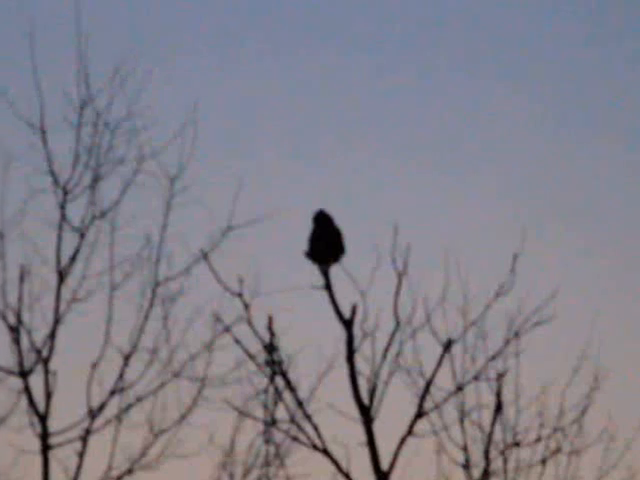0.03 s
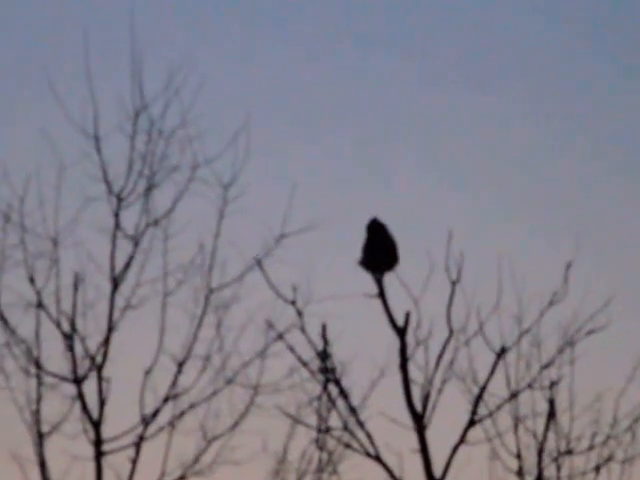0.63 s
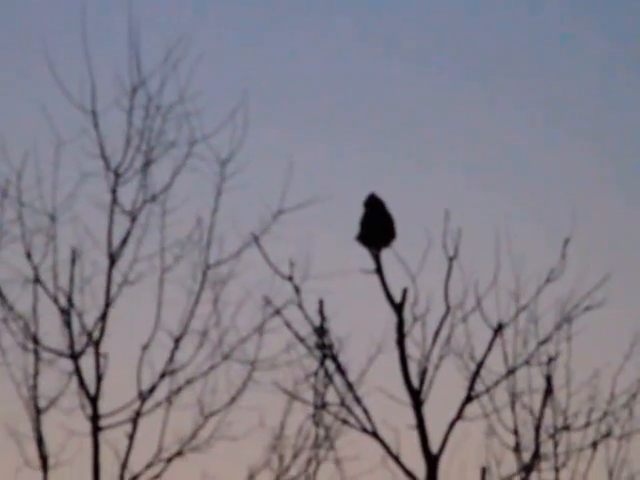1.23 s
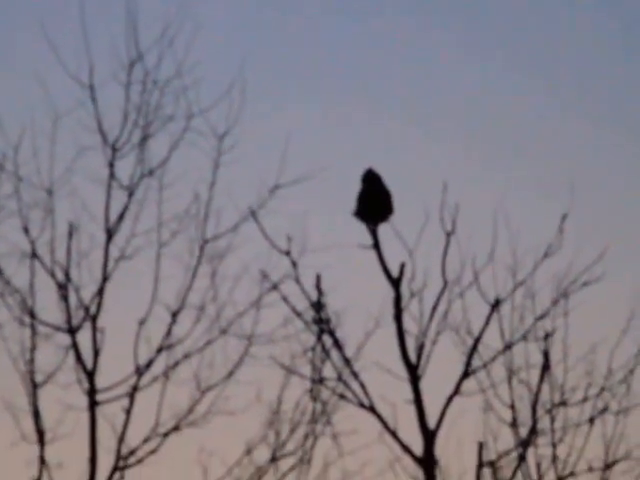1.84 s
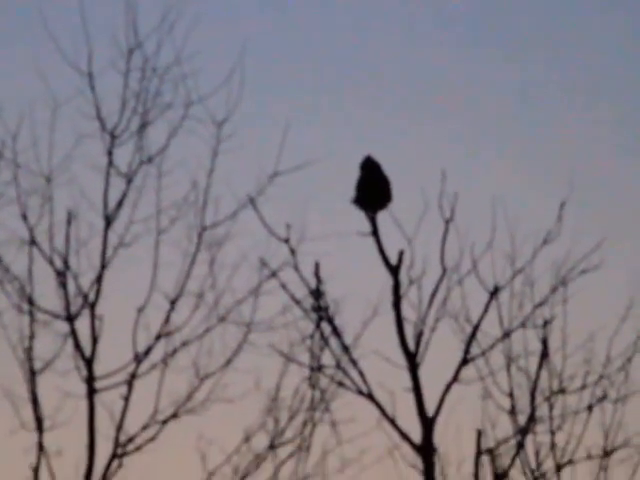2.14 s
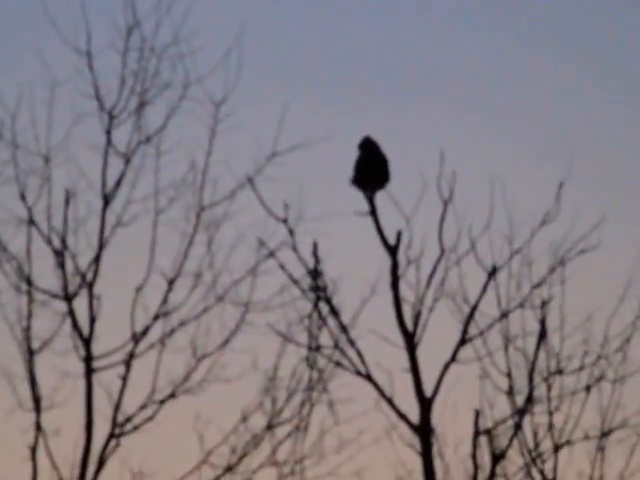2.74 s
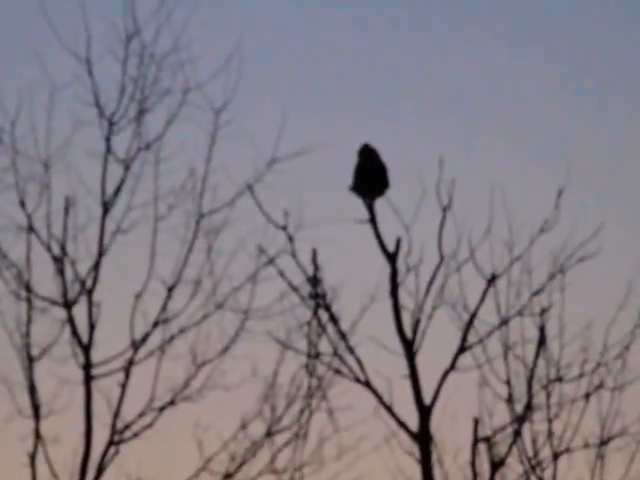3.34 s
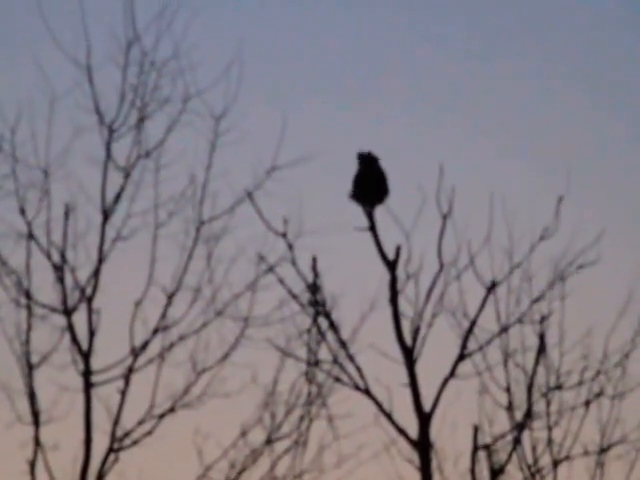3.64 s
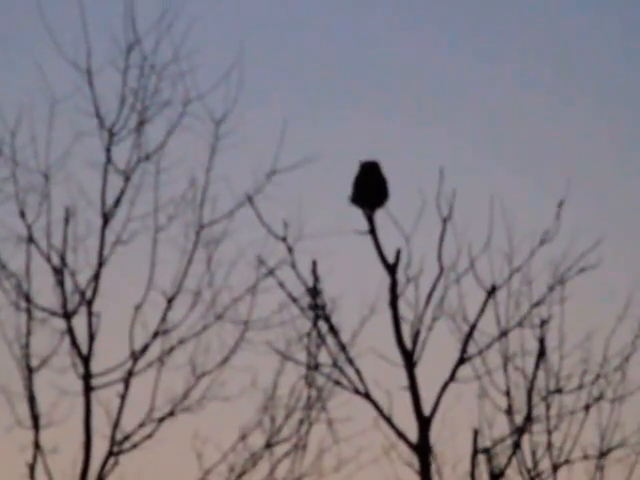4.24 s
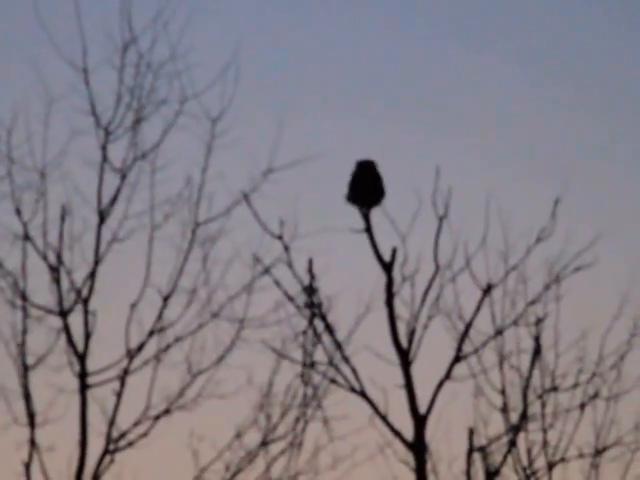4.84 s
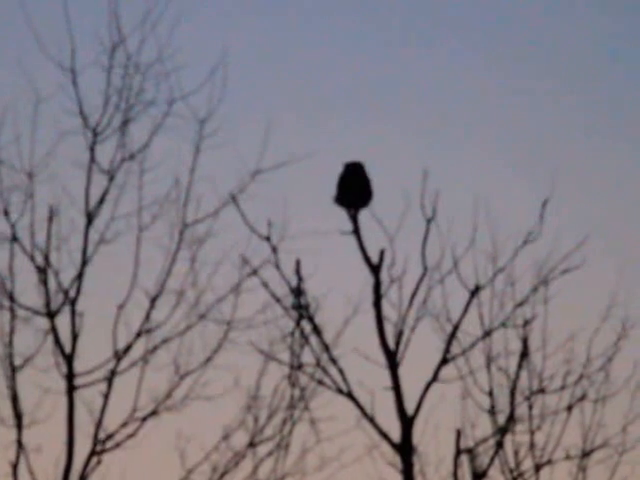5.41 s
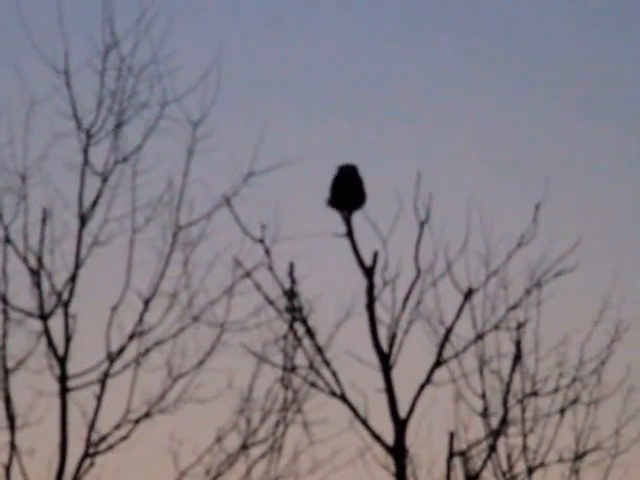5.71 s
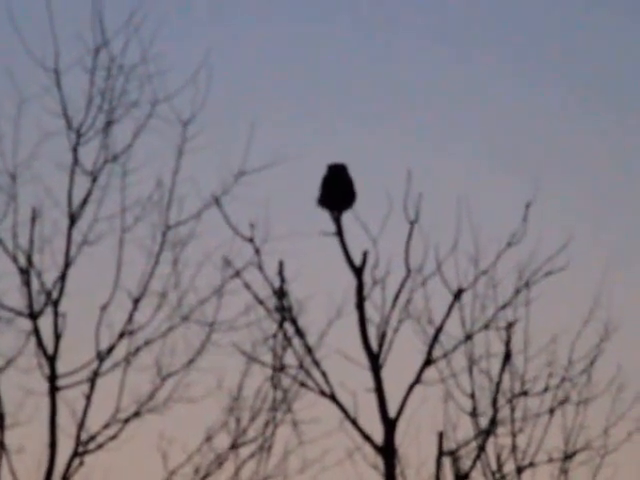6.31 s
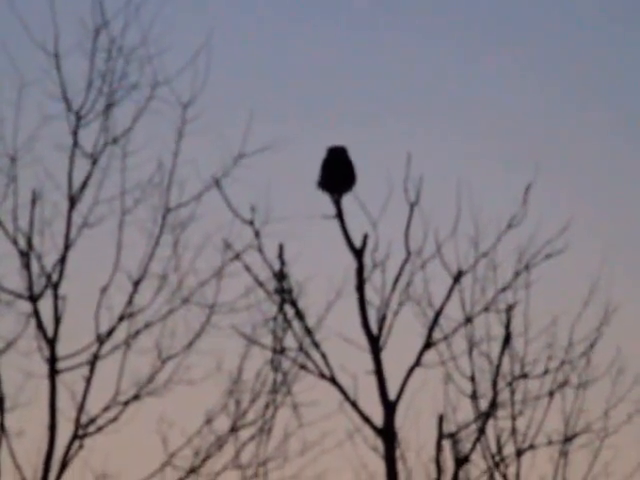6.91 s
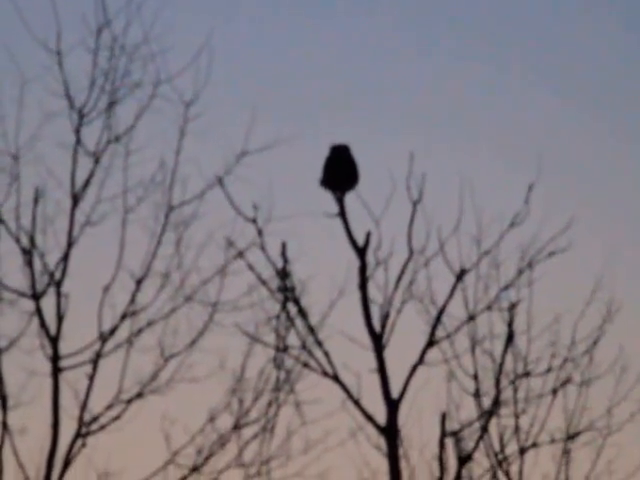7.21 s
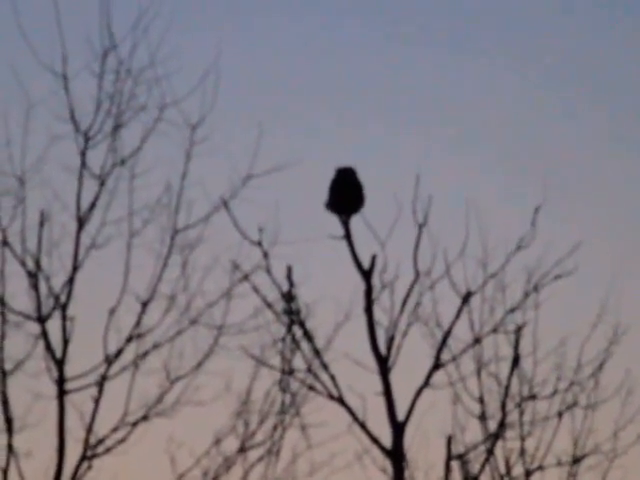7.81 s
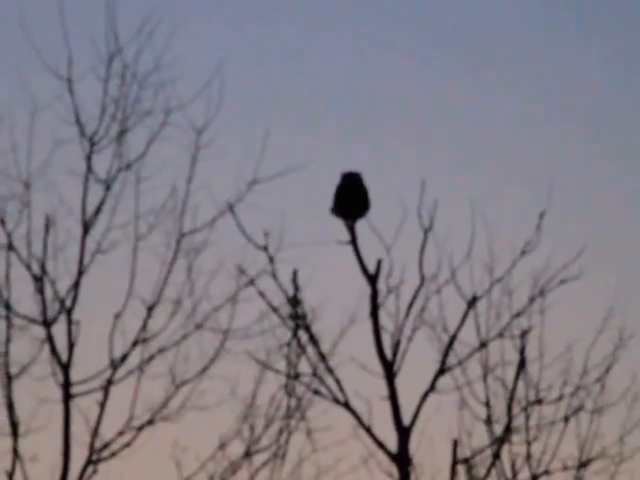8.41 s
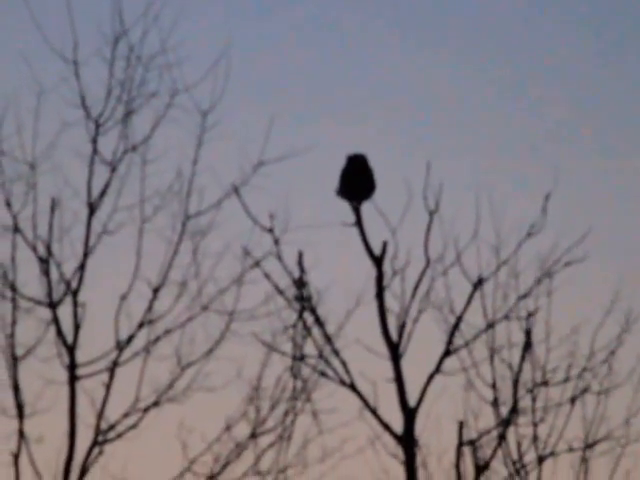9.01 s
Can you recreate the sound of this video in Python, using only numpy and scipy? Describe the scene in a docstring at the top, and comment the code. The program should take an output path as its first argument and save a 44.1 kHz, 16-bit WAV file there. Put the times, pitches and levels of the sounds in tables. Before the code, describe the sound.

A young owl gives one short raspy screech among trees, over gusts of wind buffeting the microphone and a faint distant rush.

```python
"""A young owl on a bare treetop gives one rasping begging screech, which echoes away among the trees.
Its syrinx sounds two voices at once, a rough whistle near 3 kHz and a soft low tone near 1 kHz;
fluttering membranes make the rasp. Gusts buffet the microphone over a distant outdoor rush,
and the hand-held camera rustles and ticks."""
import sys
import numpy as np
from scipy import signal
from scipy.fft import rfft, irfft, next_fast_len
from scipy.io import wavfile
from scipy.ndimage import uniform_filter1d

SR = 44100
rng = np.random.default_rng(int(sys.argv[2]) if len(sys.argv) > 2 else 0)


def master(y):
    """Save y as 16-bit WAV."""
    cut = np.clip(np.atleast_2d(y).T, -1, 1)
    pcm = np.round(cut * 32767)  # scale
    wavfile.write(sys.argv[1], SR, pcm.astype(np.int16))


N = 403515
TIME = np.arange(N) / SR


def from_db(db):
    """Decibels to gain."""
    return 10 ** (np.asarray(db) / 20)


def rms_one(x):
    """Scale to unit rms."""
    return x / np.sqrt(np.mean(x ** 2) + 1e-20)


def in_time(rows):
    """Value columns of a time curve, interpolated per sample."""
    times_s, *columns = np.transpose(rows)
    return [np.interp(TIME, times_s, column) for column in columns]


def during(rows):
    """True while a curve lasts."""
    return (TIME > rows[0][0]) & (TIME < rows[-1][0])


def noise(spectrum):
    """Unit-rms noise shaped by (frequency [Hz], gain [dB]) rows."""
    size = next_fast_len(N)
    hz, db = np.transpose(spectrum)
    bins_hz = np.maximum(np.arange(size // 2 + 1) * SR / size, 1)
    gain = from_db(np.interp(np.log(bins_hz), np.log(hz), db))
    return rms_one(irfft(rfft(rng.standard_normal(size)) * gain, size)[:N])


def wobble(rate_hz):
    """Unit-rms random motion, low-passed at rate_hz."""
    lowpass = signal.butter(2, rate_hz, fs=SR, output="sos")
    return rms_one(signal.sosfilt(lowpass, rng.standard_normal(N + SR))[SR:])


def resonate(x, hz, width_hz):
    """Two-pole resonance, unit peak gain."""
    radius = np.exp(-np.pi * width_hz / SR)
    feedback = [1, -2 * radius * np.cos(2 * np.pi * hz / SR), radius ** 2]
    return signal.lfilter(np.array([1, 0, -1]) * (1 - radius ** 2) / 2, feedback, x)


def band(x, hz, width_hz):
    """Two equal resonances in series."""
    return resonate(resonate(x, hz, width_hz), hz, width_hz)


def phase_of(hz):
    """Running phase [rad] of a moving frequency."""
    return 2 * np.pi * np.cumsum(hz) / SR


def bursts(rows):
    """Envelope of sudden onsets with exponential decay."""
    return sum((TIME >= start_s) * from_db(db - 60 * np.clip((TIME - start_s) / t60_s, 0, 2))
               for start_s, db, t60_s in rows)


def swells(rows):
    """Envelope of bell-shaped swells, summed in power."""
    power = sum(from_db(db) ** 2 * np.exp(-2 * np.minimum(((TIME - centre_s) / half_s) ** 2, 20))
                for centre_s, db, half_s in rows)
    return np.sqrt(power)


def background(body_gain_db=2.0, edge_gain_db=2.5, hiss_db=-60, swell_width_hz=110):
    """Far rush of the landscape with faintly pitched swells, plus microphone hiss."""
    # (time [s], body level [dB], upper edge level [dB])
    rush_levels = [(0, -51, -55.5), (1.27, -52.5, -55), (1.65, -53, -59), (2.9, -55.5, -58.5),
                   (4.3, -53, -59), (5.3, -54.5, -62), (6.5, -54.5, -61.5), (8.2, -53.5, -59.5),
                   (9.15, -52, -59)]
    # (frequency [Hz], gain [dB])
    body_spectrum = [(25, 7), (60, -6.5), (120, 5.5), (180, 1), (350, 1.5), (600, 2), (850, -1.5),
                     (1200, -13), (2000, -31.5)]
    edge_spectrum = [(500, -12.5), (800, -2.5), (1050, 0.5), (1300, -5), (1700, -11), (2400, -26.5),
                     (4000, -28)]
    hiss_spectrum = [(300, -6.5), (2000, 4), (4500, 2), (7000, -.5), (11000, -1.5), (14000, -5),
                     (16000, -17)]
    # (centre [s], pitch [Hz], peak [dB], half length [s])
    rush_swells = [(1.007, 1020, -54.5, 0.086), (1.317, 1010, -56, 0.22), (4.093, 780, -61, 0.24),
                   (4.9, 796, -61, 0.31), (9.03, 1040, -63, 0.13)]
    body_db, edge_db = in_time(rush_levels)
    rush = from_db(body_db + body_gain_db) * noise(body_spectrum)
    rush += from_db(edge_db + edge_gain_db) * noise(edge_spectrum)
    for centre_s, hz, db, half_s in rush_swells:
        hum = rms_one(band(rng.standard_normal(N), hz, swell_width_hz))
        rush += from_db(db) * np.exp(-((TIME - centre_s) / half_s) ** 2) * hum
    return rush + from_db(hiss_db) * noise(hiss_spectrum)


def airflow(breeze_spread_db=4.5, gust_spread_db=3.0, puff_hz=17):
    """Flow strength at the microphone port: a puffing breeze and steadier gusts."""
    # (time [s], level [dB])
    breeze_levels = [(0, -61.5), (.7, -42.5), (1.38, -50), (1.8, -41.5), (2.3, -45.5), (2.8, -40.5),
                     (3.35, -47), (4.15, -53), (4.6, -57.5), (5.05, -57.5), (5.65, -38.5), (6.0, -47.5),
                     (6.6, -38.5), (7.4, -61), (7.8, -49.5), (8.3, -61.5), (9.15, -62.5)]
    # (centre [s], peak [dB], half length [s])
    gusts = [(.093, -36.5, 0.021), (.41, -35, 0.038), (.657, -21, 0.014), (.79, -29.5, 0.085),
             (1.82, -34.5, 0.068), (1.945, -29, 0.015), (2.15, -31.5, 0.03), (2.255, -22.5, 0.024),
             (2.415, -24, 0.052), (2.51, -28, .018), (2.62, -27, 0.02), (2.71, -33.5, 0.07),
             (3.295, -33, 0.026), (3.56, -38, 0.051), (3.88, -34.5, 0.011), (4.403, -32.5, 0.015),
             (5.235, -42.5, .02), (5.32, -38, 0.017), (5.51, -25, 0.043), (5.69, -27, 0.066),
             (5.818, -28.5, 0.019), (6.11, -32.5, 0.068), (6.372, -27.5, 0.041), (6.56, -29, 0.081),
             (6.83, -21.5, 0.015), (6.92, -24, .025), (7.06, -37.5, 0.033), (7.225, -37, 0.033),
             (7.67, -40, 0.061), (7.95, -40, .022)]
    puffs = np.clip(wobble(puff_hz), -2, 1)
    breeze = from_db(in_time(breeze_levels)[0] + breeze_spread_db * puffs)
    return np.hypot(breeze, swells(gusts) * from_db(gust_spread_db * puffs))


def wind(rumble_db=1.0, churn_db=-20, churn_full_db=-25, sputter_db=3.5, sputter_hz=60,
         swing_gain_db=2.0, swing_cycles=0.52, edge_gain_db=1.5, edge_s=0.0066, crackle_db=9):
    """Airflow rumbles and, when strong, sputters; each eddy thumps the port with one pressure swing."""
    # (frequency [Hz], gain [dB])
    rumble_spectrum = [(20, -27), (38, -4.5), (70, 2.5), (130, -0.5), (200, -13.5), (300, -20.5),
                       (500, -51), (1000, -70.5)]
    # (time [s], swing level [dB], swing frequency [Hz], turbulent edge level [dB])
    eddies = [(.642, -15.5, 170, -38), (.798, -16.5, 129, -26.5), (1.823, -19, 106, -36.5),
              (2.267, -21.5, 142, -43), (2.375, -8, 150, -17.5), (2.398, -10, 183, -17.5),
              (2.42, -17, 150, -23), (2.438, -10, 138, -30), (2.45, -14.5, 335, -22),
              (2.453, -2.5, 156, -25), (5.435, -27.5, 131, -49), (5.51, -15, 208, -32.5),
              (5.69, -18, 181, -36), (5.743, -13, 107, -30), (5.755, -14, 195, -24), (5.83, -21, 238, -36),
              (6.053, -26, 138, -39), (6.367, -18.5, 292, -30.5), (6.462, -28, 161, -33),
              (6.492, -14, 135, -28.5), (6.515, -15.5, 192, -37), (6.543, -9, 155, -38),
              (6.976, -20.5, 118, -42)]
    rumble = noise(rumble_spectrum)
    rumble /= np.sqrt(uniform_filter1d(rumble ** 2, size=1100) + .05)  # level evened over 25 ms
    flow = airflow()
    churn = noise([(120, -22), (260, 2.5), (380, 3.5), (520, -7), (750, -27), (1200, -51), (3000, -75)])
    crackle = noise([(300, -18), (650, 13), (1000, -6), (1400, -15), (2200, -47), (5000, -75)])
    sputter = from_db(churn_db + sputter_db * wobble(sputter_hz))
    turbulence = np.minimum(flow / from_db(churn_full_db), 1) * sputter
    out = flow * (from_db(rumble_db) * rumble + turbulence * churn)
    phases_rad = rng.uniform(-0.56, 1, len(eddies))
    for (centre_s, swing_db, hz, edge_db), phase in zip(eddies, phases_rad):
        near = slice(max(int((centre_s - .05) * SR), 0), int((centre_s + .05) * SR))
        age_s = TIME[near] - centre_s
        swing = np.cos(2 * np.pi * hz * age_s + phase) / np.cosh(2 * hz * age_s / swing_cycles)
        edge = churn[near] * np.exp(-(age_s / edge_s) ** 2)
        tip = crackle[near] * np.exp(-(2 * age_s / edge_s) ** 2)
        edge_peak = from_db(edge_db + edge_gain_db)
        tip_peak = from_db(crackle_db) * edge_peak ** 2  # finest turbulence: square law
        out[near] += from_db(swing_db + swing_gain_db) * swing
        out[near] += edge_peak * edge / np.abs(edge).max() + tip_peak * tip / np.abs(tip).max()
    return out


def handling(grain_db=3, grain_hz=460):
    """Fingers rub the camera in grainy slips; its case ticks and the grip creeps."""
    # (start [s], level [dB], t60 [s])
    rustles = [(.155, -34.5, 0.06), (.171, -41.5, 0.24)]
    ticks = [(.218, -42, 0.0064), (.238, -59, 0.33), (.33, -60, 1), (3.011, -58, 0.065),
             (3.526, -52.5, .015), (3.979, -51.5, .022), (5.082, -53, 0.025), (7.669, -55, .02)]
    # (centre [s], peak [dB], half length [s])
    creeps = [(3.05, -70, 0.28), (3.95, -70, 0.24), (7.78, -65.5, .1)]
    # (frequency [Hz], gain [dB])
    rustle_spectrum = [(150, 14.5), (450, 10.5), (1200, -3), (2600, -11), (3600, 1), (4300, 0), (5100, -15),
                       (6000, -4), (7500, -17), (10000, -11), (15000, -22)]
    tick_spectrum = [(3000, -25), (7000, -7), (10000, 3), (14000, 1), (16000, -13)]
    grain = from_db(grain_db * wobble(grain_hz))
    fingers = bursts(rustles) * noise(rustle_spectrum)
    case = (bursts(ticks) + swells(creeps)) * noise(tick_spectrum)
    return grain * (fingers + case)


def owl(rasp_hz=165, jitter_hz=115, squeal_jitter_hz=75, shimmer_db=3.5, shimmer_hz=200,
        lower_db=-20, upper_db=-22, octave_db=-16):
    """Two coupled syrinx voices and throat hiss, roughened by uneven membrane flutter."""
    # (time [s], pitch [Hz], level [dB], roughness [ratio])
    high_voice = [(2.67, 3180, -72, 0.68), (2.715, 3116, -55, 0.74), (2.765, 3124, -45.5, 0.9),
                  (2.803, 3164, -38, 0.42), (2.843, 3094, -40.5, 0), (2.868, 2892, -42, 0.47),
                  (2.915, 2850, -44, 0.13), (2.95, 2953, -40, 0.36), (2.972, 3100, -41, 0.7),
                  (3.045, 3160, -41.5, 0.86), (3.075, 2980, -41.5, 0.5), (3.1, 2170, -50, .8),
                  (3.112, 2030, -75, 1.1)]
    # (time [s], pitch [Hz], level [dB])
    low_voice = [(2.835, 1017, -84), (2.865, 1016, -50), (2.89, 1008, -49), (2.95, 1036, -47.5),
                 (3.005, 1058, -48), (3.06, 1033, -53), (3.09, 943, -68)]
    squeal_partial = [(2.73, 4290, -72), (2.78, 4320, -63), (2.857, 4400, -55), (2.863, 3860, -54),
                      (2.93, 3960, -52.5), (2.99, 4210, -53), (3.05, 4230, -54), (3.082, 3744, -58),
                      (3.095, 3644, -76)]  # near the sum of both pitches
    # (time [s], level [dB])
    hiss_levels = [(2.67, -75), (2.72, -56), (2.77, -49), (2.82, -51.5), (2.87, -46.5), (2.97, -47),
                   (3.06, -50), (3.09, -54), (3.11, -67)]
    # throat and beak: (frequency [Hz], width [Hz], gain [dB])
    resonances = [(2200, 390, -10.5), (2690, 210, -9), (3150, 240, -6), (3870, 200, -11), (4240, 230, -15),
                  (4900, 860, -19.5), (6150, 260, -23)]
    high_hz, high_db, roughness = in_time(high_voice)
    low_hz, low_db = in_time(low_voice)
    squeal_hz, squeal_db = in_time(squeal_partial)
    roughness = np.clip(roughness, 0, 1)
    flutter_phase = phase_of(rasp_hz * (1 + 0.33 * wobble(87)))
    chop_depth = .8 * roughness
    chop = (1 + chop_depth * np.cos(flutter_phase)) / np.sqrt(1 + chop_depth ** 2 / 2)
    # jitter grows as the pitch collapses
    spread_hz = jitter_hz * roughness * (np.median(high_hz[during(high_voice)]) / high_hz) ** 2
    high_phase = phase_of(high_hz + spread_hz * wobble(320))
    low_phase = phase_of(low_hz * (1 + .005 * wobble(80)))
    # flutter splits the whistle into two beating strands
    split = .85 * roughness
    strands = (np.sin(high_phase) + split * np.sin(high_phase - flutter_phase)) / np.sqrt(1 + split ** 2)
    # combination tones: the low voice modulates the whistle
    coupling = from_db(low_db - low_db.max()) ** .5
    lower = from_db(lower_db) * np.sin(high_phase - low_phase)
    upper_phase = high_phase + 2 * low_phase - flutter_phase + wobble(450)
    upper = from_db(upper_db) * coupling * np.sin(upper_phase)
    octave = from_db(octave_db) * resonate(np.sin(2 * high_phase), hz=6070, width_hz=150)  # beak
    partials = strands + chop * (coupling * (lower + upper) + octave)
    flicker_db = shimmer_db * roughness * np.clip(wobble(shimmer_hz), -2, 1)
    whistle = from_db(high_db + flicker_db) * partials * during(high_voice)
    squeal_phase = phase_of(squeal_hz + squeal_jitter_hz * wobble(310))
    squeal = from_db(squeal_db) * chop * np.sin(squeal_phase) * during(squeal_partial)
    low_tone = from_db(low_db) * np.sin(low_phase) * during(low_voice)
    air = sum(from_db(db) * band(rng.standard_normal(N) * chop, hz, width_hz)
              for hz, width_hz, db in resonances)
    hiss = from_db(in_time(hiss_levels)[0]) * rms_one(air) * during(hiss_levels)
    return np.sqrt(2) * (whistle + squeal + low_tone) + hiss


def tree_echoes(call, centre_hz=3020, width_hz=600, build_s=0.019):
    """Distinct echoes and diffuse scatter from branches, both favouring the whistle's band."""
    # ground, near trunks, far tree lines: (delay [s], gain [dB])
    reflections = [(.0062, -24), (.05, -12), (0.097, -20), (.165, -16.5), (.66, -33), (.85, -29)]
    # (t60 [s], gain [dB])
    tails = [(.55, -7.5), (3.0, -16.5)]
    sent = resonate(call, centre_hz, width_hz)
    echoes = sum(from_db(db) * np.interp(TIME - delay_s, TIME, sent, left=0)
                 for delay_s, db in reflections)
    age_s = TIME[:2 * SR]
    onset = 1 - np.exp(-age_s / build_s)
    response = 0
    for t60_s, db in tails:
        tail = rng.standard_normal(len(age_s)) * from_db(-60 * age_s / t60_s) * onset
        response += from_db(db) * tail / np.linalg.norm(tail)
    return echoes + signal.fftconvolve(sent, response)[:N]


def scene():
    """Mono mix: owl and echoes over wind, far rush and handling."""
    call = owl()
    return (call + tree_echoes(call) + wind() + background() + handling())[None]


def record(dry, open_s=.035, ceiling=.65, highpass_hz=27, lowpass_hz=15700):
    """Recorder: brief initial mute, soft clipping, band limits."""
    opened = dry * (TIME > open_s)
    rounded = ceiling * np.tanh(opened / ceiling)
    highpass = signal.butter(2, highpass_hz, "high", fs=SR, output="sos")
    lowpass = signal.ellip(10, .1, 80, lowpass_hz, fs=SR, output="sos")
    return signal.sosfilt(lowpass, signal.sosfilt(highpass, rounded))


dry = scene()
out = record(dry)
master(out)
```